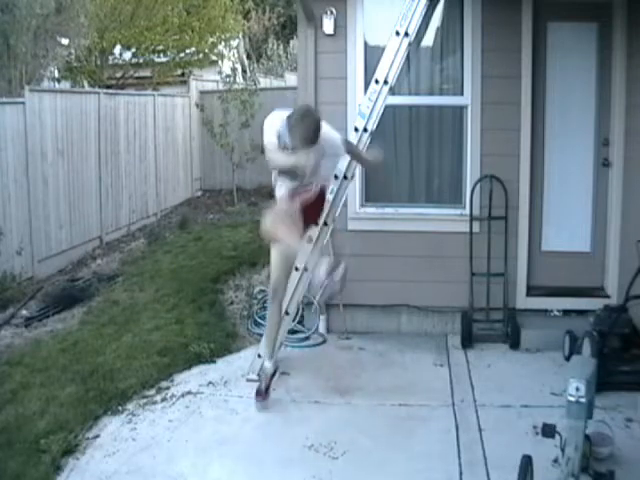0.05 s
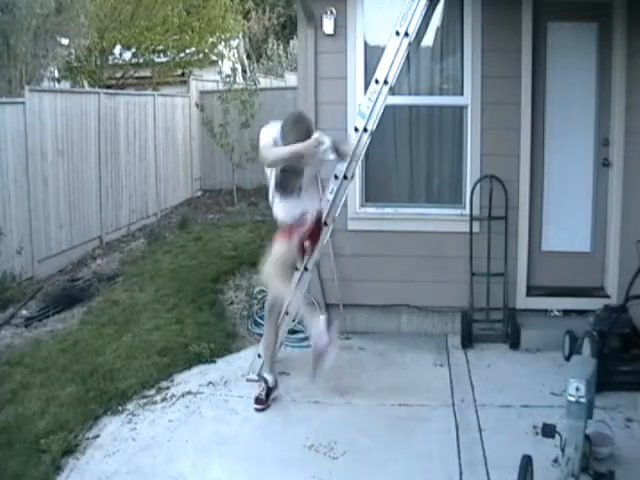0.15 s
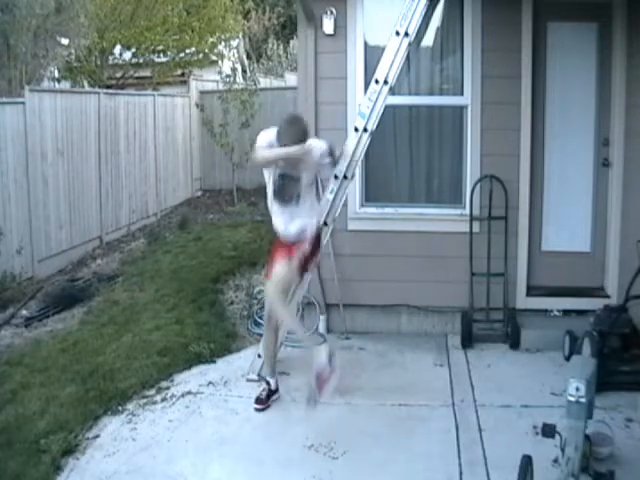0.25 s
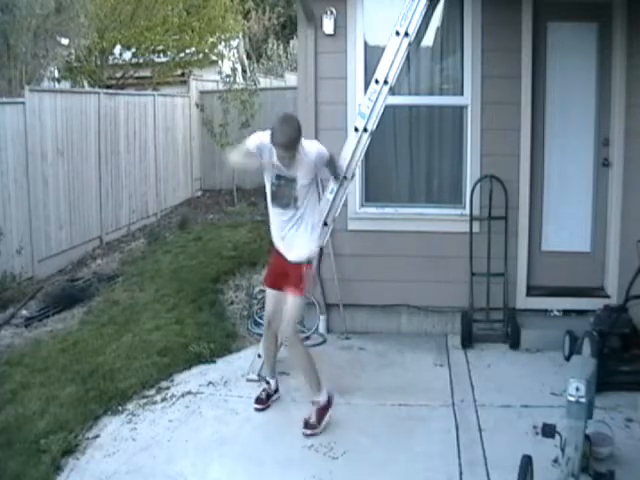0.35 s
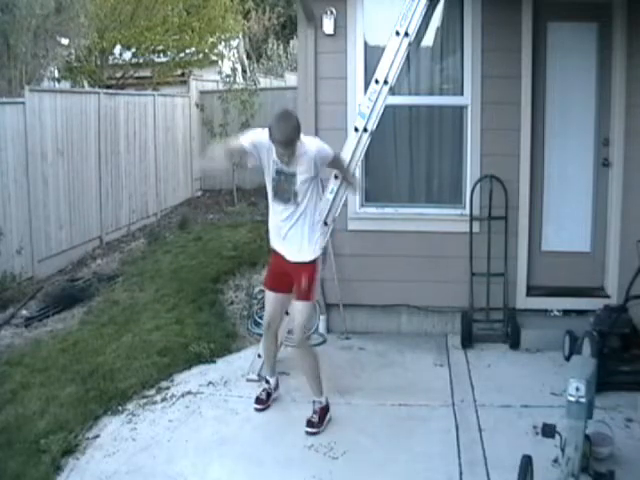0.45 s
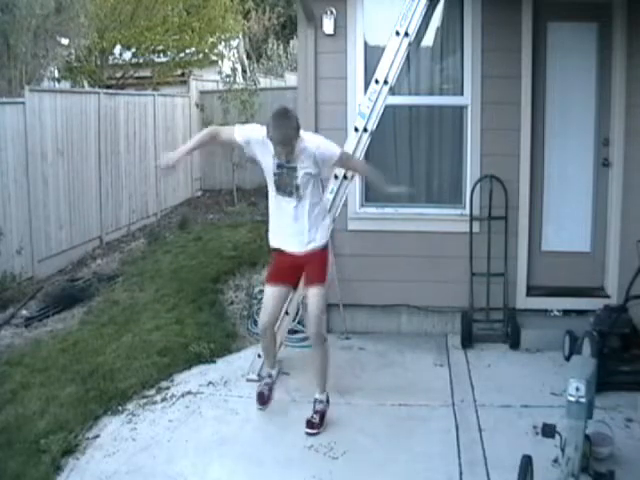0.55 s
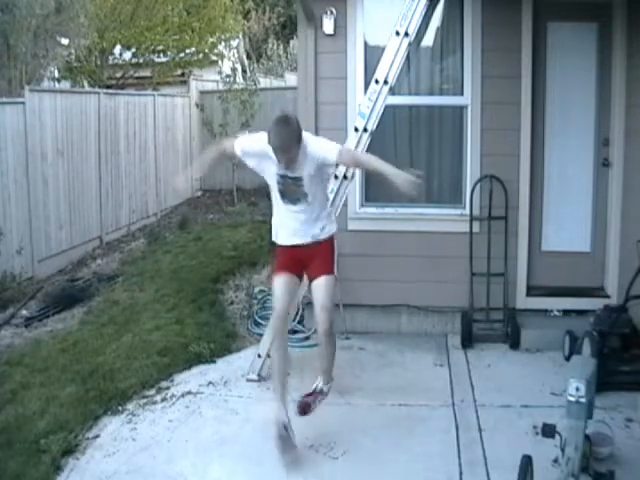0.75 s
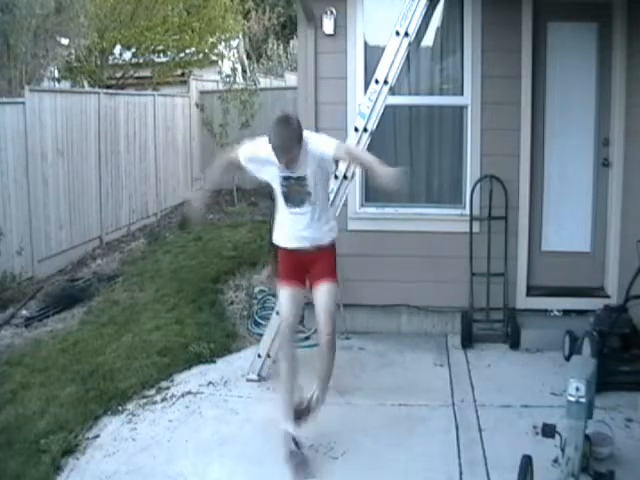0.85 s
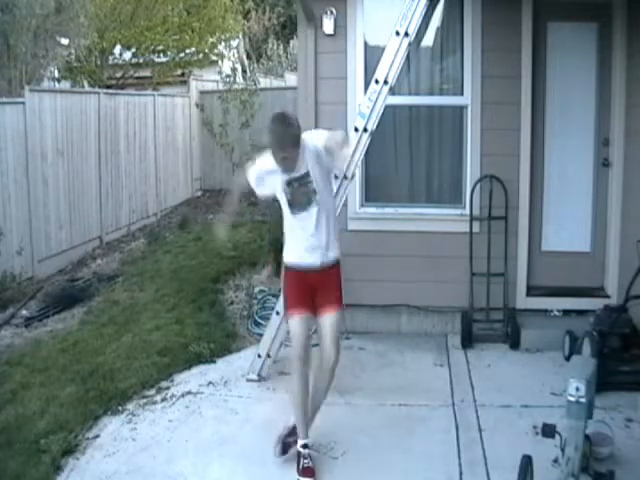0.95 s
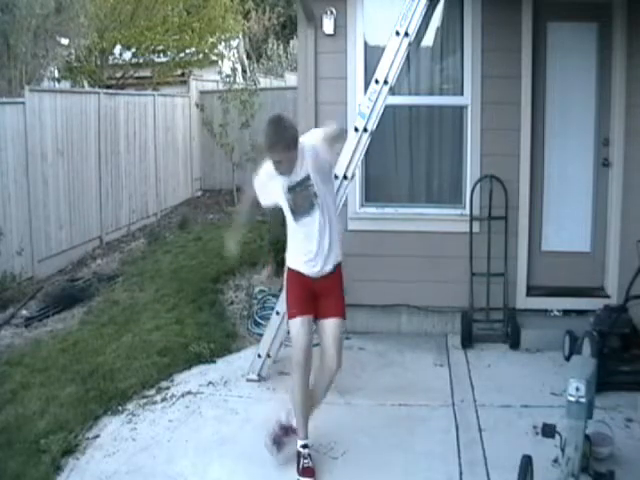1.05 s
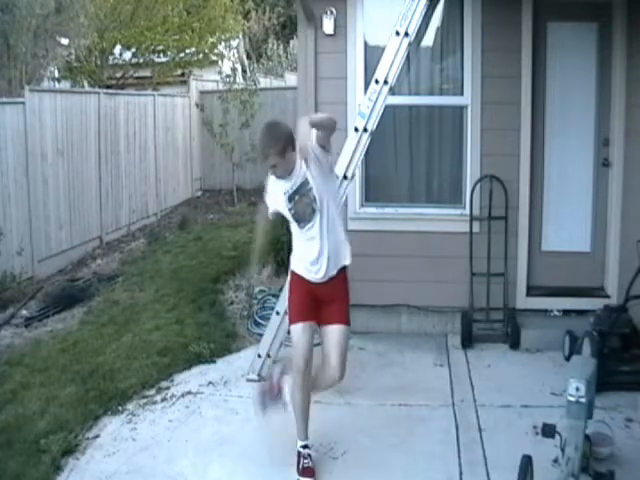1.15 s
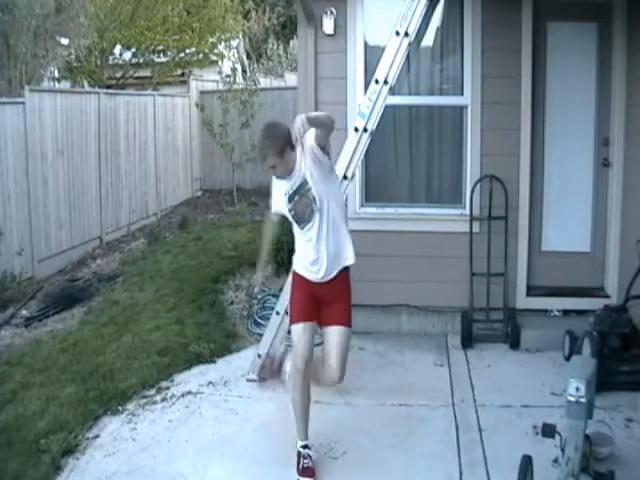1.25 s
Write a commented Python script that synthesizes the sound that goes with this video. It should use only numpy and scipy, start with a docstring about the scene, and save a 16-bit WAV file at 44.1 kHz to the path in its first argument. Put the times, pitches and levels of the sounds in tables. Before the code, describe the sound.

Three shoe landings on a concrete patio, with gritty scuffs and a faint outdoor hum.

```python
"""Trainers land on a concrete patio three times as someone plays footbag: a light hop, a hard
two-footed landing and a hollow-sounding step. Each sole slaps out air, thuds, rings and ticks.
The soles also scuff over grit and chirp as a foot turns; single grains or the bag's filling click.
A house wall and a wooden fence throw back short echoes over a low outdoor hum,
and a small microphone picks it all up."""
import sys
import numpy as np
from scipy import signal
from scipy.fft import rfft, irfft
from scipy.io import wavfile

SR = 44100
rng = np.random.default_rng(int(sys.argv[2]) if len(sys.argv) > 2 else 0)


def int16_out(signal):
    """Quantize to a 16-bit WAV file."""
    q = np.round(np.clip(np.atleast_2d(signal).T, -1, 1) * 32767)
    wavfile.write(sys.argv[1], SR, q.astype(np.int16))


N = 57330   # 1.3 seconds
OPPOSITE = np.array([[1], [-1]])   # adds a sound on the left and subtracts it on the right, for width


def from_db(db):
    """Turn decibels (dB) into a number to multiply by."""
    return 10 ** (np.asarray(db) / 20)


def rms_one(x):
    """Scale a sound so that its average strength (rms) is 1."""
    return x / np.sqrt(np.mean(x ** 2) + 1e-20)


def since(start):
    """Seconds since a moment, zero before it."""
    return np.maximum(np.arange(N) / SR - start, 0)


def ring(start, hz, fade_s):
    """A sharp blow: a tone starts at once and falls by 60 dB in fade_s seconds."""
    t = since(start)
    return np.sin(2 * np.pi * hz * t) * from_db(-60 * np.minimum(t / fade_s, 5))


def soft_ring(start, hz, swell_s):
    """A cushioned blow: a tone swells for swell_s seconds, then dies away."""
    t = since(start)
    return np.sin(2 * np.pi * hz * t) * t / swell_s * np.exp(1 - np.minimum(t / swell_s, 60))


def colour(x, points):
    """Turn low and high pitches up or down along a curve through (Hz, dB) points."""
    hz, db = np.transpose(points)
    all_hz = np.maximum(np.arange(N + 1) * SR / (2 * N), 1)
    gain = from_db(np.interp(np.log(all_hz), np.log(hz), db))
    return irfft(rfft(x, 2 * N) * gain)[..., :N]


def butter(x, hz, kind, order=2):
    """Keep the "low" part of a sound, its "high" part or a "band" between two pitches."""
    sections = signal.butter(order, np.clip(hz, 10, SR / 2 - 100), kind, fs=SR, output="sos")
    return signal.sosfilt(sections, x + 1e-18)


def stereo_noise(points):
    """Shaped noise; its width is how strong the left-right difference is next to the shared part."""
    hz, db, width_db = np.transpose(points)
    shared, side = rng.standard_normal((2, N))
    return colour(shared, np.c_[hz, db]) + colour(side, np.c_[hz, db + width_db]) * OPPOSITE


def outdoor_hum():
    """Distant traffic and air blend into a low, steady noise."""
    # Each row: pitch in Hz, relative level in dB, width in dB.
    hum_shape = [(25, 5.5, -3), (45, -6.5, -15.5), (66.4, 1, -14), (140, -10, -12.5), (191, -4, -11.5),
                 (231, -8, -13.5), (370, -2, -16), (674, -15, -7.5), (1180, -27, -5), (2200, -31.5, -6),
                 (8000, -33, -6.5)]
    return from_db(-43) * rms_one(stereo_noise(hum_shape))


def yard(x):
    """The direct sound, three faint echoes, quick scatter from the yard and a slow tail from far off."""
    # Echoes from ground, house wall and fence. Each row: delay in seconds, level in dB.
    bounces = [(.0055, -27.5), (0.022, -16), (0.04, -26)]
    # Sound scattered in the yard. Each row: pitch in Hz, relative level in dB, width in dB.
    near_shape = [(80.5, -8.5, -21.5), (170, -7.5, -14), (290, -6.5, -4.5), (480, -4, -14.5),
                  (640, -7, -10), (1000, -2.5, -12.5), (1500, -3, -6), (3100, -7.5, -8.5),
                  (8000, -10.5, -1)]
    # The neighbourhood's later answer. Each row: pitch in Hz, relative level in dB, width in dB.
    far_shape = [(80, -19.5, -15), (171, -17, -14), (255, -14.5, -9), (385, -10, -11.5), (620, -17, -4),
                 (940, -13, -7), (1500, -13, -4.5), (3570, -17, -10), (8000, -15, -7)]
    near_rise_s, near_fade_s = 0.0084, 0.32   # a fade is the time to fall by 60 dB
    far_rise_s, far_fade_s = 0.036, 0.89
    time = np.arange(N) / SR
    echoes = sum(from_db(db) * np.interp(time - delay, time, x, left=0) for delay, db in bounces)
    t = since(0.0068)
    near = np.minimum(t / near_rise_s, 1) * from_db(-60 * t / near_fade_s)
    far = np.minimum(t / far_rise_s, 1) * from_db(-60 * t / far_fade_s)
    tail = (stereo_noise(near_shape) * near + stereo_noise(far_shape) * far) / np.sqrt(np.sum(near ** 2))
    return x + echoes + signal.fftconvolve(x[None], tail, axes=1)[:, :N]


def rubber_chirps():
    """As the foot turns, rubber sticks and slips unevenly for a few milliseconds."""
    # Each row: loudest moment in seconds, level in dB, pitch in Hz, half the length in seconds.
    chirps = [(1.254, -41, 1550, 0.0072), (1.296, -45, 1426, 0.006)]
    wobble_hz = 118.7
    t, out = np.arange(N) / SR, np.zeros(N)
    for middle, db, hz, half_length in chirps:
        pitch = hz + wobble_hz * rms_one(butter(rng.standard_normal(N), 293, "low"))
        swell = np.exp(-((t - middle) / half_length) ** 2)
        out += from_db(db) * swell * np.sin(2 * np.pi * np.cumsum(pitch) / SR)
    return out


def sharp_clicks():
    """Single grains of grit crack, or the footbag's filling clicks."""
    # Each row: start in seconds, level in dB, pitch in Hz.
    clicks = [(0.2287, -24.5, 1500), (0.2557, -28, 2900), (0.4350, -34.5, 1405), (0.5009, -13, 4300),
              (0.5681, -23.5, 1200), (1.1248, -25, 3500), (1.1495, -27, 3280), (1.1572, -26, 3040)]
    return sum(from_db(db) * ring(start, hz, fade_s=0.0036) for start, db, hz in clicks)


def scuffs():
    """A sole rolls and slides over many grains of uneven size, with a dull rasp of rubber."""
    # Each row: start, hold and release in seconds, grit level in dB, grit's upper edge in Hz,
    # rasp level in dB, rasp pitch in Hz.
    slides = [ (0.082, 0.015, 0.019, -50, 7700, -64.5, 1100), (0.237, 0.025, 0.012, -49, 2800, -36.5, 663),
              (0.358, 0.057, .015, -61, 7000, -60, 1006), (0.488, 0.016, 0.03, -32.5, 7600, -29.5, 483),
              (0.514, 0.046, 0.011, -31.5, 4330, -31.5, 740), (0.651, 0.042, 0.05, -49.5, 4970, -51, 923),
              (1, 0.012, 0.0025, -51, 7000, -33, 545), (1.018, 0.047, 0.022, -41.5, 6500, -45.5, 554),
              (1.074, 0.053, 0.0053, -52.5, 6000, -41.5, 450),
              (1.121, 0.027, 0.059, -41, 4800, -47.5, 1390)]
    grains_per_s, size_spread_db = 6000, 4
    rise_s, grit_low_hz, rasp_octaves = 0.0016, 870, 1.38
    out = np.zeros(N)
    for start, hold, release, grit_db, edge_hz, rasp_db, rasp_hz in slides:
        sizes = from_db(size_spread_db * np.minimum(rng.exponential(1, N), 4)) * rng.choice([-1, 1], N)
        grains = sizes * (rng.random(N) < grains_per_s / SR)
        grit = rms_one(butter(butter(grains, edge_hz, "low"), grit_low_hz, "high", order=1))
        rasp_band_hz = rasp_hz * 2 ** (rasp_octaves * np.array([-.5, .5]))
        rasp = rms_one(butter(rng.standard_normal(N), rasp_band_hz, "band"))
        t = since(start)
        loudness = np.minimum(t / rise_s, 1) * np.exp(-np.maximum(t - hold, 0) / release)
        out += loudness * (from_db(grit_db) * grit + from_db(rasp_db) * rasp)
    return out


def landings():
    """A sole meets concrete: a slap of air from under it, a low thud, the shoe's hollow ring, a tick; a few
    brighter returns of such blows come back from the house wall."""
    # Each row: start in seconds, slap level in dB, slap pitch in Hz, then the levels of the thud, the hollow
    # ring and the tick in dB. The rows at 0.247 s and 0.512 s are returns from the house wall.
    contacts = [ (0.2285, -26, 450, -31.5, -30, -35.5), (0.2340, -26.5, 450, -23.5, -41, -30),
                (0.2470, -28, 1000, -35, -53, -36.5), (0.4903, -10, 515, -15, -23, -24.5),
                (0.494, -33, 480, -22, -17.5, -21.5), (0.512, -12, 1000, -18, -27, -21.5),
                (0.5220, -17.5, 353, -23.5, -24.5, -37.5), (0.5315, -43.5, 526, -17.5, -26, -44.5),
                (1.0010, -20.5, 690, -36, -25, -40), (1.0140, -42.5, 570, -27, -22.5, -39),
                (1.045, -21, 589, -39, -33, -54), (1.1027, -40, 480, -38, -49, -39)]
    slap_swell_cycles, tick_decay_s = 0.32, 0.0018
    out = np.zeros(N)
    for start, slap_db, slap_hz, thud_db, hollow_db, tick_db in contacts:
        out += from_db(slap_db) * soft_ring(start, slap_hz, swell_s=slap_swell_cycles / slap_hz)
        out += from_db(thud_db) * soft_ring(start, hz=169.5, swell_s=0.0021)
        out += from_db(hollow_db) * soft_ring(start, hz=422.3, swell_s=0.0027)
        t = since(start)
        tick = .5 * rng.standard_normal(N) * (t > 0) * np.exp(-t / tick_decay_s)
        out += from_db(tick_db) * tick
    return butter(out, 84, "high")   # a shoe is too small to give off deep bass


def scene():
    """Footwork in the yard over the outdoor hum; the grit sounds a little different left and right."""
    hum = outdoor_hum()
    scuff_width = from_db(-11.5) * scuffs() * OPPOSITE
    footwork = landings() + scuffs() + sharp_clicks() + rubber_chirps()
    return yard(footwork) + scuff_width + hum


def record(dry):
    """A small microphone feeds a half-rate recorder, which mirrors its treble faintly higher up."""
    # The microphone's tone. Each row: pitch in Hz, boost or cut in dB.
    mic_tone = [(100, 2), (1000, 4), (1500, 3), (2000, 0), (3000, 1.5), (4700, 1), (5600, -4),
                (8300, -12.5)]
    bass_edge_hz, treble_edge_hz, cutoff_hz = 61, 8600, 16000
    x = butter(colour(dry, mic_tone), bass_edge_hz, "high")
    x = signal.sosfilt(signal.ellip(10, .3, 70, treble_edge_hz, fs=SR, output="sos"), x)
    mirrored = x * (-1) ** np.arange(N)   # flipping every other sample swaps low and high pitches
    x = x + from_db(-5.5) * mirrored
    return signal.sosfilt(signal.ellip(12, .3, 80, cutoff_hz, fs=SR, output="sos"), x)


dry = scene()
out = record(dry)
int16_out(out)
```